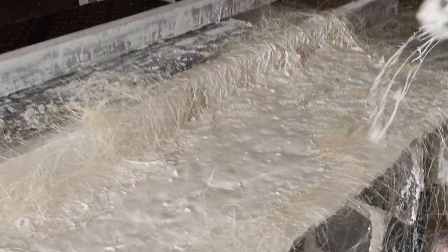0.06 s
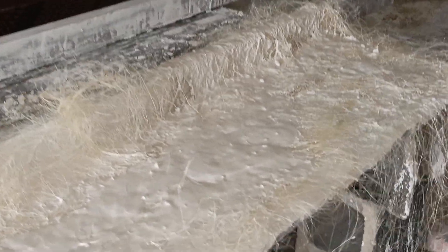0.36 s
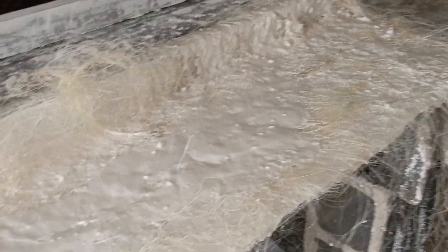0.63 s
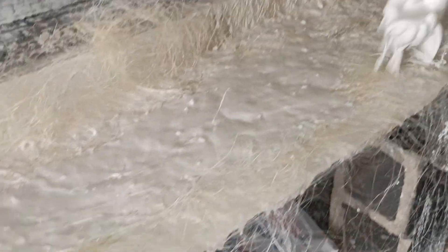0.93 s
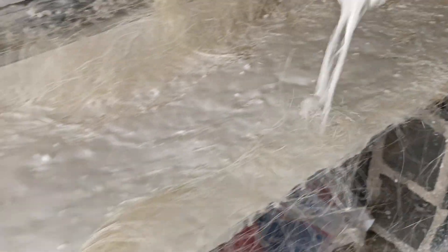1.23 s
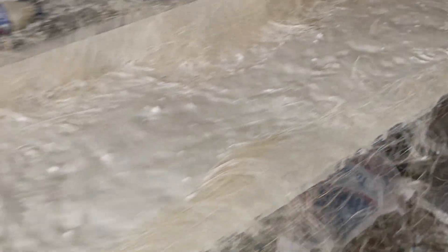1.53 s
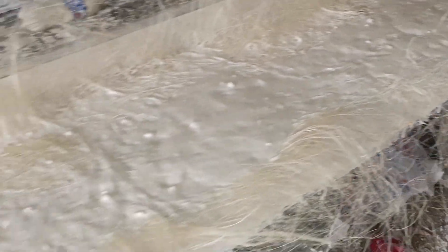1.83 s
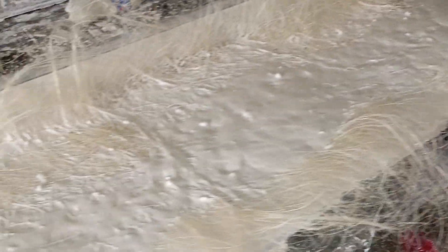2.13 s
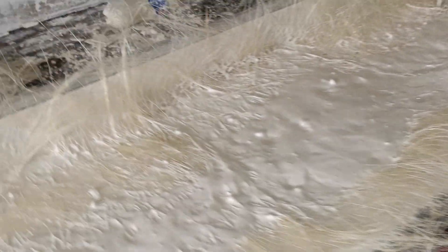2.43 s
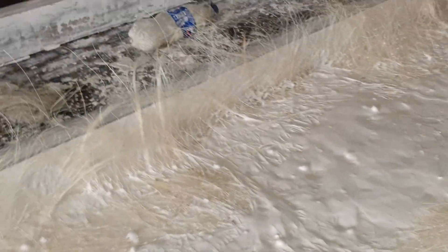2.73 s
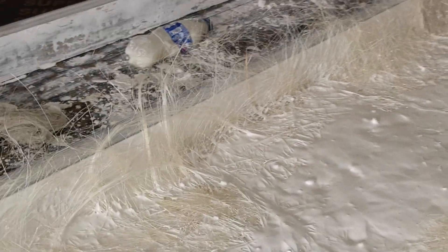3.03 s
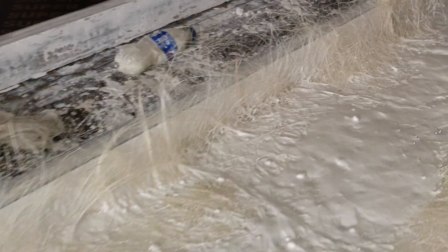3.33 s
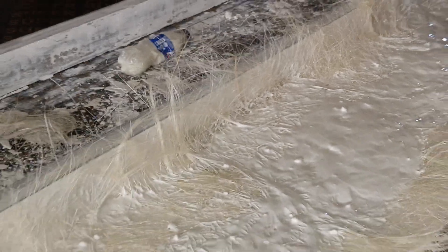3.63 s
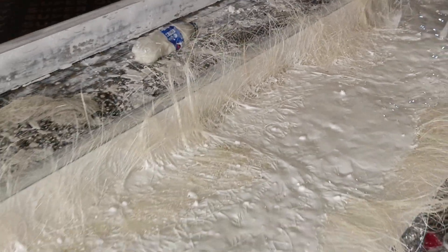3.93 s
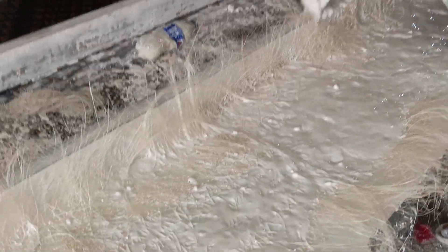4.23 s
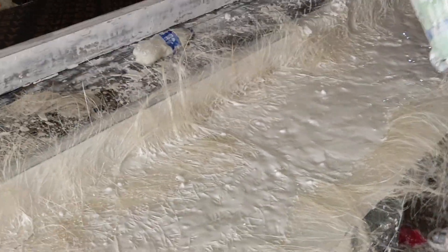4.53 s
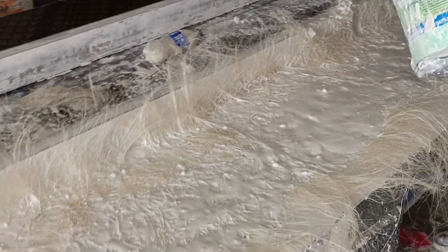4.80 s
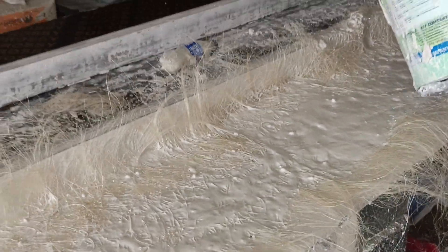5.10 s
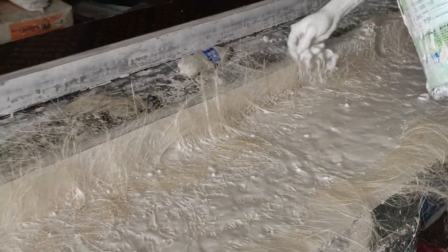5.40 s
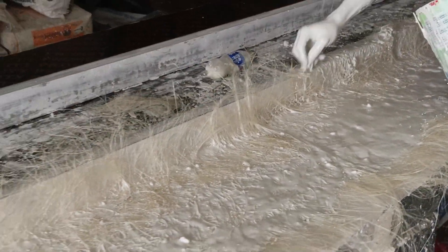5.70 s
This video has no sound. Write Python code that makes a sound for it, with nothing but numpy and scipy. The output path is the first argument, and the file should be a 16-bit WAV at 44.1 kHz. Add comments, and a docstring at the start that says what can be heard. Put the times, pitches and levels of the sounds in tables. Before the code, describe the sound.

Wet plaster slurry patters onto fibre right from the start, in a hard-walled workshop with a short echo and a faint steady rush of air. Uneven hand strokes bring fine spray, bubble pops and sticky crackling, with a firm double slap just before 0.9 seconds. The busiest splattering runs from about 1.6 to 2.5 seconds, with lumps slapping down, hollow gulps and soft thuds from the mould. At about 3 seconds a plastic bucket is set down with a quick clack and a low hollow boom. From 3.4 seconds a hand sloshes and squelches in the slurry over low thudding, with a sharp wet pop and splash near 4.1 seconds. After a lull around 4.5 to 5 seconds, more sloshes, gulps and small slaps continue until about 5.8 seconds. Bright wet sounds lean right, low ones stay near the centre, and a thin dribble runs at the far right.

```python
"""A hard-walled workshop, where wet plaster is scooped from a bucket and flung over fibre in a long mould.
Slurry patters and sprays in swarms of tiny bubbles, lumps slap down, air pockets gulp and drone,
wet fibre crackles and the mould thuds under the load. A thin dribble runs on at the right.
Midway the bucket is knocked down once with a clack and a boom, then the hand sloshes about in it."""
import sys
import numpy as np
from scipy import signal
from scipy.fft import rfft, irfft, next_fast_len
from scipy.io import wavfile
from scipy.ndimage import uniform_filter1d, map_coordinates

SR = 44100
rng = np.random.default_rng(int(sys.argv[2]) if len(sys.argv) > 2 else 0)


def transcribe(signal):
    """Save signal, clipped to [-1, 1], as a 16-bit WAV file at the path in sys.argv[1]."""
    frames = np.atleast_2d(signal).T
    limited = np.clip(frames, -1, 1)
    pcm = np.round(limited * 32767).astype(np.int16)
    wavfile.write(sys.argv[1], SR, pcm)


N = 253707

# Strokes of the hand, scooping, flinging or stirring:
# (time [s], rise [s], hold [s], t60 [s], patter level [dB], spray level [dB], slosh level [dB])
STROKES = [(0.0, 0.0002, 0.023, 0.81, -38, -44, -50.5), (0.417, 0.0079, 0.016, 0.29, -40.5, -52.5, -59),
           (0.692, 0.017, 0.03, 0.55, -42, -51.5, -50), (0.784, 0.0051, 0.16, 0.42, -36, -44, -41.5),
           (0.978, 0.021, 0.013, 0.61, -34, -40.5, -50), (1.265, 0.004, 0.19, 0.35, -51.5, -64, -61),
           (1.585, 0.03, 0.033, 0.63, -41, -46.5, -54), (1.699, 0.086, 0.027, 1.6, -35.5, -45.5, -42.5),
           (1.96, 0.2, 0.02, 0.52, -27.5, -42, -36), (2.24, 0.14, 0.014, 0.79, -33, -45.5, -48),
           (2.522, 0.092, 0.086, 0.41, -42, -54, -57.5), (2.861, 0.0085, 0.0056, 0.18, -36, -42, -43.5),
           (3.039, 0.0049, 0.041, 0.56, -48, -49.5, -47), (3.4, 0.091, 0.026, 0.34, -45.5, -50.5, -81),
           (3.573, 0.069, 0.04, 0.29, -42, -62, -49), (3.67, 0.13, 0.14, 0.73, -42.5, -55, -36.5),
           (4.047, 0.0077, 0.028, 0.56, -32, -43, -39.5), (4.147, 0.015, 0.13, 0.83, -45, -56, -45),
           (5.095, 0.052, 0.093, 0.78, -50.5, -66.5, -44), (5.37, 0.051, 0.036, 0.57, -39, -47.5, -39.5),
           (5.545, 0.024, 0.016, 1.4, -45.5, -58, -43)]
SPRAY_LIFE = 0.8  # the spray's decay time as a share of the stroke's t60
TOP_HZ = 15900


def amp(db):
    """Decibels to gain."""
    return 10 ** (np.asarray(db) / 20)


def unit(x):
    """Scale to rms 1."""
    return x / np.sqrt(np.mean(x ** 2) + 1e-20)


def along(points, hz):
    """Read (frequency, value) points on a log frequency axis."""
    freqs, values = np.transpose(points)
    return np.interp(np.log(hz + 1), np.log(freqs), values)


def automation(points):
    """Join (time, value) points into one value per sample."""
    return np.interp(np.arange(N) / SR, *np.transpose(points))


def wobble(rate, size):
    """A smooth random curve, rate knots a second."""
    return map_coordinates(rng.standard_normal(2048), [np.arange(size) * rate / SR], mode="wrap")


def coloured(x, gain):
    """Filter by a gain that depends on frequency."""
    n = x.shape[-1]
    padded = next_fast_len(n + 8192)
    return irfft(rfft(x, padded) * gain(np.fft.rfftfreq(padded, 1 / SR)), padded)[..., :n]


def equalised(x, spectrum):
    """EQ through (frequency, level) points, then scale to rms 1."""
    return unit(coloured(x, lambda hz: amp(along(spectrum, hz))))


def add(track, s, sound):
    """Mix a sound into a stereo track at time s."""
    start = round(s * SR)
    track[:, start:start + sound.shape[-1]] += sound[..., :N - start]


def sides(pan_db):
    """Constant-power left and right gains; a positive pan leans left."""
    ratio = np.atleast_1d(amp(pan_db))
    return np.array([ratio, np.ones(len(ratio))]) * np.sqrt(2 / (1 + ratio ** 2))


def gesture(s, rise, hold, t60):
    """Envelope of one movement: it builds up, holds and dies away."""
    t = np.arange(N) / SR - s
    return np.clip(t / rise, 0, 1) * amp(-60 * np.clip((t - rise - hold) / t60, 0, 2))


def flow(levels_db, life):
    """Envelope of all strokes, adding in power; life scales their decay times."""
    return np.sqrt(sum((amp(db) * gesture(s, rise, hold, life * t60)) ** 2
                       for (s, rise, hold, t60, *_), db in zip(STROKES, levels_db)))


def murmur(pitch, width_hz):
    """Narrow noise of rms about 1 that follows a pitch curve."""
    phase = 2 * np.pi * np.cumsum(pitch) / SR
    return wobble(width_hz, len(pitch)) * np.cos(phase) + wobble(width_hz, len(pitch)) * np.sin(phase)


def bubbles(low_hz, high_hz, cycles, scatter_db, lag_s, count, size):
    """A swarm of damped sines, each falling 60 dB over its cycles, left and right up to lag_s apart."""
    when, pitch, side = rng.random((3, count, 1))
    hz = low_hz * (high_hz / low_hz) ** pitch
    turns = hz * np.arange(size) / SR
    strength = hz * amp(scatter_db * np.minimum(rng.exponential(size=(count, 1)), 4))
    ring = strength * np.sin(2 * np.pi * turns) * amp(-60 * turns / cycles)
    starts = [np.abs(when * N + way * (side - .5) * lag_s * SR).astype(int) for way in (-1, 1)]
    return np.array([np.bincount((s + np.arange(size)).ravel(), ring.ravel(), N)[:N] for s in starts])


def washed(swarm, spectrum, wash_db):
    """Lay a swarm on a noise wash of countless smaller bubbles and EQ it, rms 1."""
    return equalised(unit(swarm) + amp(wash_db) * rng.standard_normal((2, N)), spectrum)


def workshop(x, wet_db):
    """Hard walls add a diffuse tail, different on each side and for every half second of sound."""
    # Decay of the room: (frequency [Hz], t60 [s])
    walls = [(100, 0.063), (400, 0.24), (1600, 0.5), (5000, 0.45), (15000, 0.31)]
    out, size = x.copy(), SR // 2
    for start in range(0, N, size):
        hz, t, noise = signal.stft(rng.standard_normal((2, size)), SR, nperseg=256)
        tail = signal.istft(noise * amp(-60 * t / along(walls, hz)[:, None]), SR, nperseg=256)[1]
        tail = np.pad(tail / np.linalg.norm(tail[0]), ((0, 0), (SR // 300, 0)))  # pre-delay
        add(out, start / SR, amp(wet_db) * signal.fftconvolve(x[:, start:start + size], tail, axes=1))
    return out


def placed(x, shadow_hz=1060):
    """The treble leans right, toward the work; lower sound bends round to both sides."""
    # Where the slurry lands: (time [s], left minus right [dB])
    place = [(0, -12.5), (.25, -12), (.42, -15), (.6, -15), (.72, -2.5), (5.75, -6)]
    treble = coloured(x, lambda hz: 1 - 1 / (1 + (hz / shadow_hz) ** 8))
    return x + treble * (sides(automation(place)) - 1)


def air(level_db=-74):
    """The faint steady rush of the workshop."""
    # Room tone: (frequency [Hz], level [dB])
    spectrum = [(25, -31.5), (100, 6), (480, 12.5), (1500, -10), (16000, -2)]
    return amp(level_db) * equalised(rng.standard_normal((2, N)), spectrum)


def dribble(flutter_db=2.5, pan_db=-17):
    """A thin run of slurry crackles on at the far right."""
    # Strength of the run-off: (time [s], level [dB])
    runoff = [(0, -58), (1.45, -52.5), (2.8, -56), (4.4, -55), (4.7, -55), (4.88, -58.5), (5.02, -70.5),
              (5.75, -57.5)]
    # Tone of its drops: (frequency [Hz], level [dB])
    spectrum = [(950, -32), (1350, 0), (1900, 4), (3400, -5), (4200, -25.5), (5800, -7.5), (8000, -39),
                (10500, -18), (16000, -54)]
    drops = bubbles(1210, 14000, cycles=12, scatter_db=-1.5, lag_s=0.00029, count=3500, size=200)
    drops = washed(drops, spectrum, wash_db=9.5)
    return drops * amp(flutter_db * wobble(28, N) + automation(runoff)) * sides(pan_db)


def splatter(firm_db=-40, large_pop_hz=980):
    """Slurry breaks on the fibre in clumps: short pops and a finer spray."""
    # Tone of the pops: (frequency [Hz], level [dB])
    patter_spectrum = [(600, -41), (900, -12.5), (1350, -4), (1900, -4.5), (2800, -5.5), (3600, -7.5),
                       (4200, -17.5), (6000, -73)]
    # Tone of the fine spray: (frequency [Hz], level [dB])
    spray_spectrum = [(2800, -44), (3700, -2), (4400, 1), (6100, 2.5), (7400, -7.5), (8200, -3),
                      (10500, -8.5), (13500, -10), (15000, -3.5), (16500, -35)]
    *_, patter_db, spray_db, _ = np.transpose(STROKES)
    patter, spray = flow(patter_db, life=0.83), flow(spray_db, SPRAY_LIFE)
    clumps = wobble(64, N)
    pops = bubbles(723, 4290, cycles=24.5, scatter_db=1.5, lag_s=0.0003, count=6000, size=560)
    pops = washed(pops, patter_spectrum, wash_db=0)
    fizz = bubbles(3050, 12600, cycles=5.2, scatter_db=0.5, lag_s=0.00018, count=6000, size=64)
    fizz = washed(fizz, spray_spectrum, wash_db=0)
    # Only firm strokes burst the large, low pops at full strength.
    large = coloured(pops, lambda hz: 1 / (1 + (hz / large_pop_hz) ** 16))
    gentle = 1 - np.minimum(patter / amp(firm_db), 1)
    coarse = patter * folds(pops - gentle * large, depth_db=2.2) * amp(1.2 * clumps - 1.94)
    fine = spray * folds(fizz, depth_db=1.8) * amp(1.97 + 0.18 * clumps)
    return workshop(coarse + fine, wet_db=-4.5)


def folds(x, depth_db):
    """Wet folds open and close, each lending the sound a brief resonance a few hundred hertz wide."""
    frames = signal.stft(x, nperseg=512)[2]
    peaks = rng.standard_normal(frames.shape[1:])
    for _ in range(2):
        peaks = uniform_filter1d(uniform_filter1d(peaks, size=3, axis=0), size=7, axis=1)
    return unit(signal.istft(frames * amp(depth_db * unit(peaks)), nperseg=512)[1][:, :N])


def mould(x, half_width_hz=24):
    """The long mould favours a few narrow bands of whatever lands in it."""
    # Its hollow rings: (frequency [Hz], boost [dB])
    rings = [(1351, 2.5), (1503, 1), (1708, 1.5), (1878, 2), (2135, 2.5), (3480, 3), (3820, 3.5)]

    def boost_db(hz):
        return sum(db / (1 + ((hz - ring_hz) / half_width_hz) ** 2) for ring_hz, db in rings)
    return coloured(x, lambda hz: amp(boost_db(hz) + 0.95))


def slosh(run_on_s=0.017, t60=0.45):
    """Larger bubbles burble in the stirred mass, which moves on a little after the hand, then settles."""
    # Tone of the burble: (frequency [Hz], level [dB])
    spectrum = [(120, -8.5), (300, -4.5), (500, 4), (800, 2), (1100, -5), (1500, -5)]
    burble = bubbles(238.1, 1254, cycles=39, scatter_db=-0.5, lag_s=0.00024, count=2000, size=2000)
    stir_power = sum((amp(db) * gesture(s, rise, hold + run_on_s, t60)) ** 2
                     for s, rise, hold, *_, db in STROKES)
    return washed(burble, spectrum, wash_db=-8.5) * np.sqrt(stir_power) * amp(-4.5)


def crackle(stroke_db=-7, rise_s=0.0072, t60=0.19):
    """Thin films part between the fibres in dense sticky ticks, under every stroke and as the mat soaks."""
    # Spells of soaking and settling: (time [s], hold [s], level [dB])
    spells = [(0.31, 0.37, -60.5), (0.8, 0.39, -48.5), (1.223, 0.3, -60), (2.285, 0.21, -51),
              (4.01, 0.045, -44.5), (4.29, 0.033, -56), (4.78, 0.064, -66)]
    *_, spray_db, _ = np.transpose(STROKES)
    soak = sum(amp(db) * gesture(s, rise_s, hold, t60) for s, hold, db in spells)
    ticks = unit(bubbles(4200, TOP_HZ, cycles=8, scatter_db=3.3, lag_s=0.0002, count=2800, size=120))
    return workshop(ticks * (soak + amp(stroke_db) * flow(spray_db, SPRAY_LIFE)), wet_db=-4)


def snaps(cycles=8, click_t60=0.017, low_cut_hz=1100):
    """A thin film bursts: a bright click and a few cycles of ring, too small to radiate any bass."""
    # Small bubbles and drops: (time [s], level [dB], pitch [Hz], relative click level [dB])
    bursts = [(0.214, -28.5, 2520, -11.5), (0.404, -36.5, 4000, -1), (0.636, -29.5, 1910, -25),
              (0.6944, -13.5, 2690, -28), (0.92, -24, 1710, -1), (1.264, -23.5, 3300, -20),
              (1.3236, -28, 1740, -5.5), (1.405, -26, 4540, -16), (2.041, -14, 1776, -37),
              (2.2625, -17, 3310, -10), (2.2944, -31, 1760, 6.5), (2.338, -17.5, 2100, -11),
              (2.375, -15, 3070, -15), (2.645, -43.5, 2023, 13), (2.868, -23, 3530, -6.5),
              (3.428, -36.5, 3180, 0.5), (3.743, -42, 3440, -2), (4.0132, -39, 2300, 9),
              (4.062, -24, 3400, -12), (4.0668, -11.5, 3600, -14), (4.901, -35.5, 1970, -28),
              (5.553, -33.5, 3430, 2)]
    out, t = np.zeros((2, N)), np.arange(SR // 50) / SR
    for s, db, hz, click_db in bursts:
        ring = np.sin(2 * np.pi * hz * t) * amp(-60 * t * hz / cycles) * (1 - np.exp(-2 * t * hz))
        hiss = unit(np.diff(rng.standard_normal((2, len(t) + 1))))
        click = hiss * amp(click_db + 1 - 60 * t / click_t60)
        add(out, s, amp(db + 1) * (ring + click))
    return coloured(out, lambda hz: 1 - np.exp(-(hz / low_cut_hz) ** 2))


def hollows(waver=0.019, rough=0.93, rise_s=0.02, t60=0.29):
    """Churning slurry keeps a hollow sounding: a soft note that is mostly narrow noise."""
    # Hollows held open in bucket and slurry: (time [s], hold [s], level [dB], pitch [Hz])
    drones = [(0.268, 0.039, -49, 217), (0.269, 0.12, -63, 840), (0.432, 0.031, -50.5, 352.5),
              (0.675, 0.072, -48.5, 440), (.74, 0.28, -46, 332.8), (0.873, 0.23, -51.5, 412.2),
              (1.154, 0.037, -55, 440), (1.6, 0.014, -52, 571), (1.676, 0.23, -47.5, 328.8),
              (1.996, 0.14, -47, 353.7), (2.602, 0.14, -55, 618), (3.493, 0.19, -54.5, 330),
              (3.69, 0.34, -47.5, 329), (3.77, 0.3, -44.5, 148.5), (4.164, 0.055, -47, 248),
              (4.312, 0.0067, -51.5, 251), (4.393, 0.11, -57, 490.6), (4.988, 0.044, -70.5, 487),
              (5.101, 0.16, -54, 318.6), (5.331, 0.05, -49, 420), (5.45, 0.15, -52.5, 804),
              (5.504, 0.29, -54.5, 239), (5.69, 0.026, -37.5, 272)]
    out = np.zeros((2, N))
    for s, hold, db, hz in drones:
        pitch = hz * (1 + waver * wobble(20.13, SR))
        tone = np.sqrt(2 * (1 - rough ** 2)) * np.sin(2 * np.pi * np.cumsum(pitch) / SR)
        breath = rough * unit(murmur(pitch, width_hz=110))
        add(out, s, amp(db) * (tone + breath) * gesture(0, rise_s, hold, t60)[:SR])
    return out


def slaps(grit_db=3, spread=0.7, rise_s=0.001):
    """Each lump bursts in a gritty splash; thick lumps are dull, thin ones bright."""
    # Lumps landing: (time [s], level [dB], centre [Hz], width [octaves], t60 [s])
    lumps = [(0.401, -43, 7040, 3.1, 0.14), (0.425, -43, 1510, 0.8, 0.27), (.709, -40, 1000, 0.35, 0.26),
             (0.786, -36, 2010, 3.2, 0.1), (.869, -23, 1260, 0.5, 0.086), (.883, -22.5, 1220, 0.78, 0.081),
             (1.263, -39.5, 2450, 1.13, 0.34), (1.602, -36.5, 1300, 1.06, 1),
             (1.622, -34.5, 2050, 0.69, 0.27), (1.811, -31, 1500, 2, .06), (1.924, -33, 1380, 1.46, 0.3),
             (2.04, -25, 1665, 1, 0.03), (2.056, -27.5, 1700, 0.99, 0.067),
             (2.116, -29.5, 1920, 1.17, 0.28), (2.374, -31.5, 2190, 2.4, 0.17),
             (2.867, -40, 3260, 0.56, 0.17), (3.502, -40, 1720, 0.26, 0.55),
             (3.861, -34.5, 1760, 1.07, 0.12), (4.062, -17.5, 3750, 0.6, 0.025),
             (5.133, -45, 2970, 0.19, 0.15), (5.222, -51, 7140, 0.43, 0.36), (5.419, -35, 910, 1.8, 0.11),
             (5.563, -39, 910, 0.79, 0.1)]
    out, t = np.zeros((2, N)), np.arange(SR // 3) / SR
    for s, db, centre_hz, octaves, t60 in lumps:
        mid, side = rng.standard_normal((2, len(t))) * amp(grit_db * wobble(951, len(t)))
        grit = np.array([mid + spread * side, mid - spread * side])
        splash = coloured(grit, lambda hz: 1 / (1 + (np.log2((hz + 1) / centre_hz) / octaves) ** 2 / 2) ** 3)
        add(out, s, unit(splash) * amp(db - 60 * t / t60) * (1 - np.exp(-t / rise_s)))
    return out


def thud(rest_db=-75, t60=0.26):
    """Soft low pushes of heavy slurry on mould and bucket, over a faint rumble as it settles."""
    # Weight bearing down: (time [s], rise [s], hold [s], level [dB])
    pushes = [(0.941, 0.019, 0.0092, -43), (1.04, 0.015, 0.073, -49), (1.726, 0.062, 0.081, -52.5),
              (2.342, 0.046, 0.046, -48.5), (3.035, 0.0088, 0.2, -44), (3.68, 0.1, 0.48, -44),
              (4.147, 0.015, 0.065, -46.5), (4.29, 0.026, 0.049, -43.5), (5.146, 0.076, 0.21, -54),
              (5.377, 0.018, 0.44, -50)]
    # Tone of the thudding: (frequency [Hz], level [dB])
    spectrum = [(25, -49), (50, -10), (70, 4.5), (140, 12), (400, -2), (700, -78)]
    rumble = bubbles(33.7, 295, cycles=7, scatter_db=1.5, lag_s=0.00018, count=1200, size=4000)
    push_power = sum((amp(db) * gesture(s, rise, hold, t60)) ** 2 for s, rise, hold, db in pushes)
    load = np.sqrt(amp(rest_db) ** 2 + push_power)
    return washed(rumble, spectrum, wash_db=-15) * load * amp(-2.5)


def gulps(glide=0.11, waver=0.038, rough=0.61, swell_cycles=0.93):
    """An air pocket rings at its own pitch, roughened by its soft walls and rising as it bursts."""
    # Air pockets in the slurry: (time [s], level [dB], pitch [Hz], t60 [s])
    pockets = [(1.76, -20, 1310, 0.034), (1.762, -25.5, 332.2, 0.33), (1.763, -23, 488, 0.12),
               (1.907, -23, 3400, .025), (2.062, -20, 1360, 0.027), (2.3695, -17, 860, 0.015),
               (3.489, -35, 980, 0.27), (3.703, -30.5, 780, 0.2), (4.88, -50, 815, 0.25),
               (5.319, -32, 836, 0.15), (5.409, -29, 252, 0.22), (5.42, -25, 812, 0.13),
               (5.589, -20.5, 1146, .035), (5.688, -31, 608, 0.12)]
    out, t = np.zeros((2, N)), np.arange(SR) / SR
    for s, db, hz, t60 in pockets:
        pitch = hz * (1 + glide * (np.minimum(t / t60, 1) - .2) + waver * wobble(58.4, len(t)))
        ring = unit(np.sin(2 * np.pi * np.cumsum(pitch) / SR) + rough * murmur(pitch, width_hz=131))
        add(out, s, ring * amp(db - 7 - 60 * t / t60) * (1 - np.exp(-t * hz / swell_cycles)))
    return out


def bucket(clack_t60=0.03, boom_db=-8, flutter_db=4.5):
    """The plastic bucket clacks; the hollow support booms unevenly as the slurry rocks inside."""
    # The bucket set down, and its rebound: (time [s], level [dB])
    knocks = [(3.043, -16.5), (3.06, -21.5)]
    # Tone of the plastic shell: (frequency [Hz], level [dB])
    spectrum = [(400, -42), (570, -6), (820, -26), (1100, -1), (1350, -0.5), (1750, -12), (2120, -1.5),
                (5000, -25.5), (6500, -8), (7400, -26), (10500, -17), (13500, -30)]
    # Modes of the hollow under the bucket: (frequency [Hz], level [dB], t60 [s])
    modes = [(106.2, -10, 0.69), (137, -13, 0.63), (171, -12, 0.62), (232, -23, 0.29)]
    clacks, booms, t = np.zeros((2, N)), np.zeros((2, N)), np.arange(SR) / SR
    for s, db in knocks:
        shell = equalised(rng.standard_normal((2, SR)), spectrum)
        add(clacks, s, shell * amp(db - 60 * t / clack_t60) * (1 - np.exp(-t / 0.0014)))
    s, db = knocks[0]
    boom = sum(amp(level - 60 * t / t60 + flutter_db * wobble(24, SR)) * np.sin(2 * np.pi * hz * t)
               for hz, level, t60 in modes)
    add(booms, s, amp(db + boom_db) * boom * (1 - np.exp(-t / 0.0035)))
    return placed(workshop(clacks, wet_db=1)) + workshop(booms, wet_db=-13)


def sucks(gurgle_db=3):
    """A cavity squelches under the hand; its note falls as it opens and rises as it closes."""
    # Drags through the slurry:
    # (time [s], level [dB], length [s], first pitch [Hz], last pitch [Hz], half-width [share of pitch])
    drags = [(3.415, -47.5, 0.077, 3790, 2687, 0.29), (3.446, -44.5, 0.076, 2002, 1102, .26),
             (4.608, -60, 0.068, 1633, 1410, .2), (4.693, -63, .14, 2750, 3400, 0.27),
             (4.835, -58.5, 0.047, 1530, 967, .2), (4.851, -72.5, 0.121, 499, 284, 0.166),
             (5.097, -48, 0.075, 1457, 720, .13), (5.546, -44, .055, 3735, 2395, 0.26)]
    out = np.zeros((2, N))
    for s, db, length, first_hz, last_hz, width in drags:
        progress = np.linspace(0, 1, round(length * SR))
        squelch = murmur(first_hz * (last_hz / first_hz) ** progress, width * (first_hz + last_hz))
        gurgle = amp(db + gurgle_db * wobble(150, len(progress)))
        add(out, s, gurgle * np.sin(np.pi * progress) * squelch)
    return out


def scene():
    """Bright wet sounds come from the right, the low ones from just left of the middle."""
    bright = mould(splatter() + workshop(slaps(), wet_db=-2))
    bright += crackle()
    bright += workshop(snaps(), wet_db=-2)
    bright += workshop(sucks(), wet_db=2)
    low = workshop(slosh(), wet_db=-1.5)
    low += workshop(gulps() + hollows(), wet_db=-2.5)
    low += workshop(thud(), wet_db=-2.5)
    return placed(bright) + dribble() + low * sides(pan_db=1.5) + bucket() + air()


def record(dry):
    """The microphone ports colour the treble; nothing passes above the band limit."""
    # Response of the ports: (frequency [Hz], gain [dB])
    ports = [(6500, -0.5), (7400, -4), (8100, -11), (9300, -5), (11500, -1.5), (13500, -9), (15000, 3),
             (15800, 3)]
    return coloured(dry, lambda hz: amp(along(ports, hz)) * (hz < TOP_HZ))


dry = scene()
out = record(dry)
transcribe(out)
```